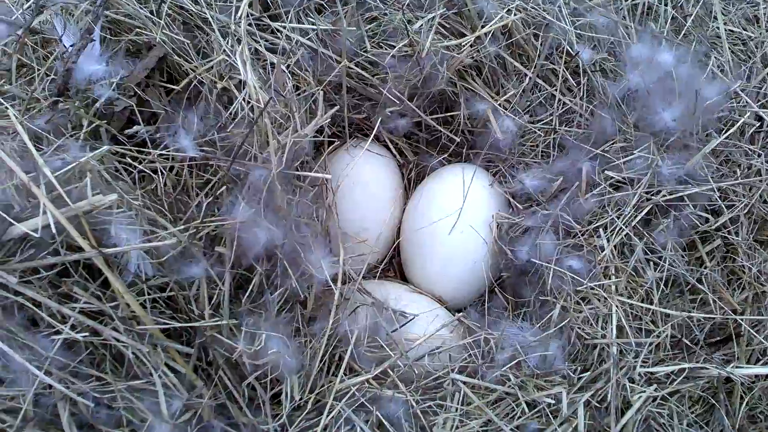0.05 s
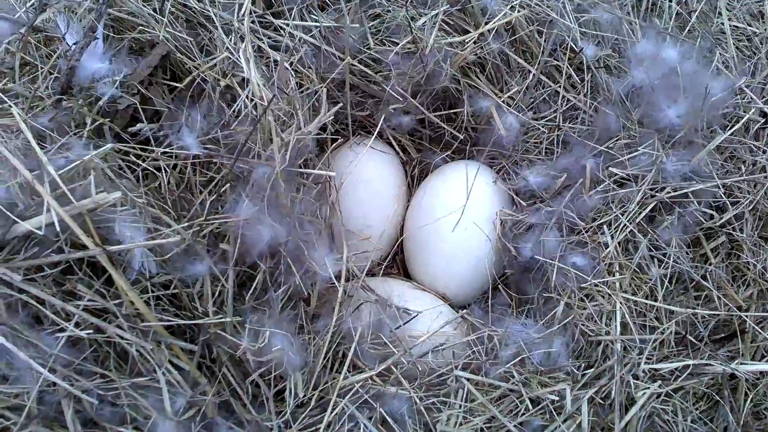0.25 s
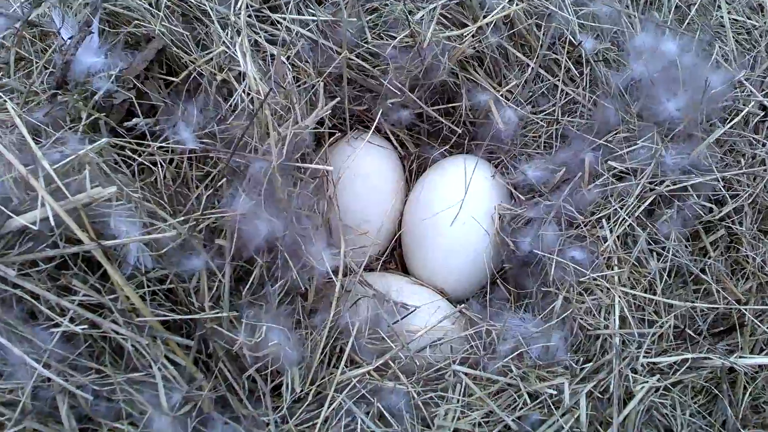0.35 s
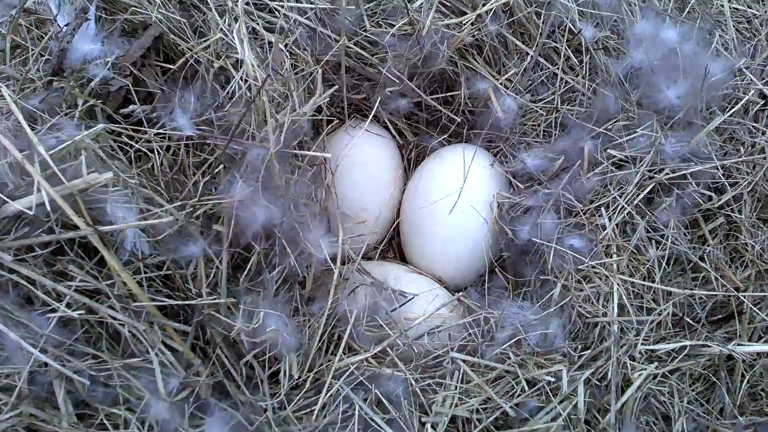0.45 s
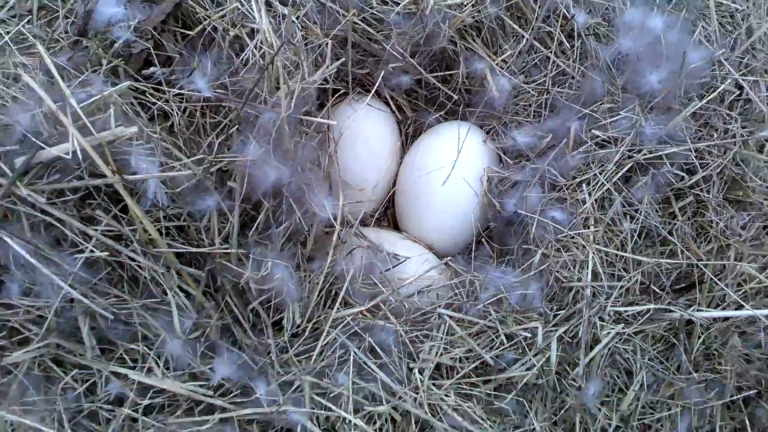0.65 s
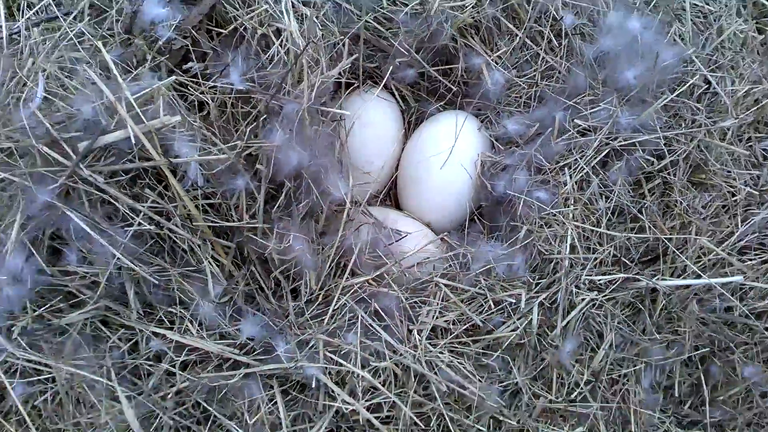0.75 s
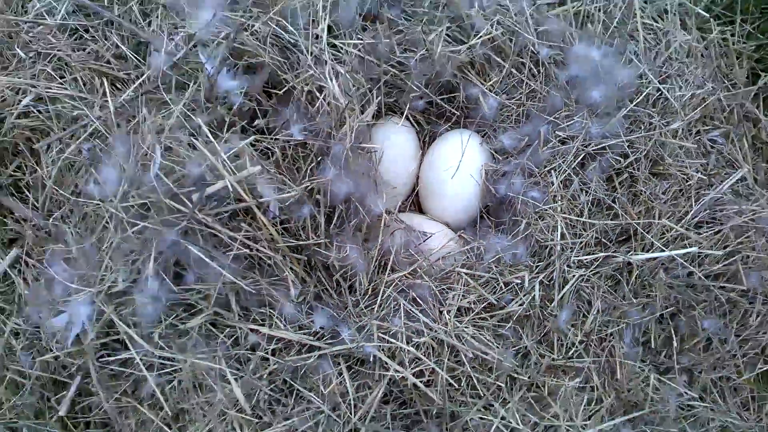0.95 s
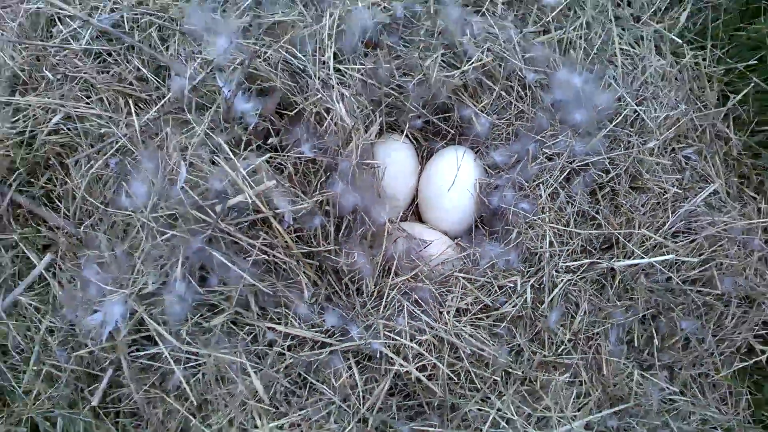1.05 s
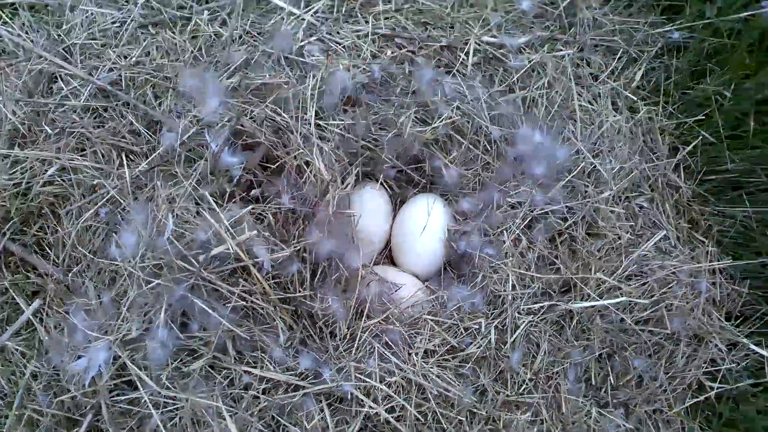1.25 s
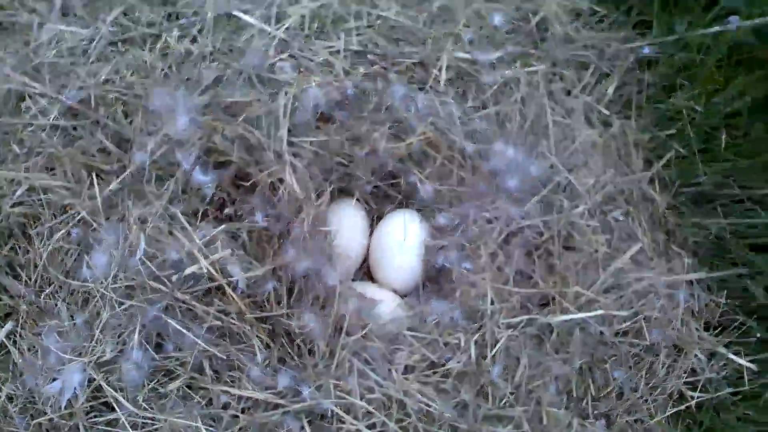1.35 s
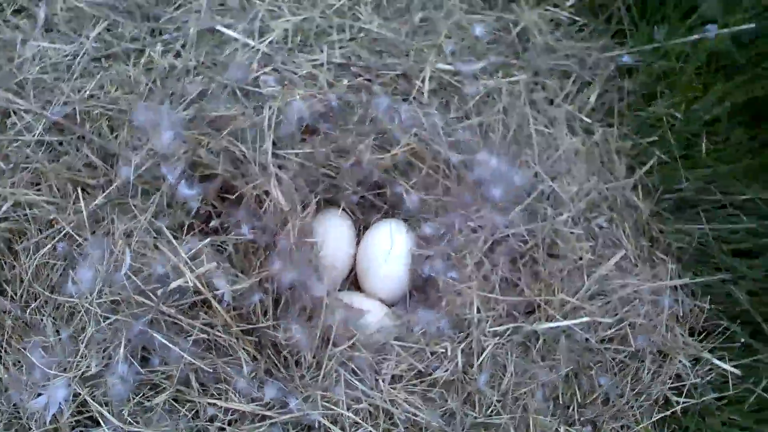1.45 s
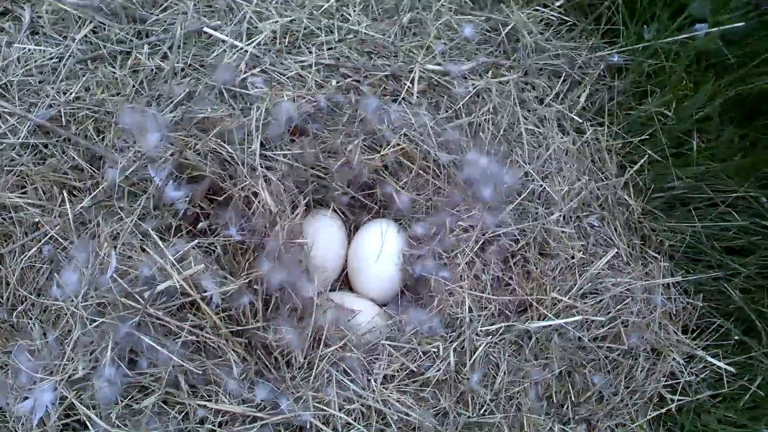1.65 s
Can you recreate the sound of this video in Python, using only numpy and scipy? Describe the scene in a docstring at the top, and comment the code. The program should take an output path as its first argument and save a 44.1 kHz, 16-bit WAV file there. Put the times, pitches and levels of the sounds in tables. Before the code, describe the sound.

A goose honks harshly from about 0.2 to 0.45 seconds, then gives a shorter honk near 0.65 seconds, both raspy with a slight outdoor echo. Low handling bumps hit the microphone, strongest around 0.5 to 0.6 seconds. Light wind rumbles throughout, with faint small bird chirps and very faint distant calls. A straw ticks once near 1.1 seconds, and the quiet background lasts until 1.7 seconds.

```python
"""Goose honking near its nest

Two harsh honks, long then short: a reedy tone and a beating shriek over air rattling through the throat.
Small birds chirp; the surroundings echo them and the goose. Faint calls carry from far off.
A hand bumps the camera, light wind rumbles on the microphone, and a straw in the hay ticks once."""
import sys
import numpy as np
from scipy import signal
from scipy.fft import rfft, irfft, next_fast_len
from scipy.io import wavfile
from scipy.ndimage import map_coordinates

SR = 44100
rng = np.random.default_rng(int(sys.argv[2]) if len(sys.argv) > 2 else 0)


def generate_wav(signal):
    """Clip the signal to [-1, 1] and save it as 16-bit WAV at the path in sys.argv[1]."""
    frames = np.transpose(np.atleast_2d(signal))
    scaled = np.clip(frames, -1, 1) * 32767
    pcm = np.round(scaled).astype(np.int16)
    wavfile.write(sys.argv[1], SR, pcm)


N = 74970
TIME = np.arange(N) / SR


def amp(db):
    """Decibels to gain."""
    return 10 ** (np.asarray(db) / 20)


def unit(x):
    """Scale to rms 1."""
    return x / np.sqrt(np.mean(x ** 2) + 1e-20)


def along(points, hz):
    """Interpolate (frequency [Hz], value) points on a log axis."""
    freqs, values = np.transpose(points)
    return np.interp(np.log(hz + 1), np.log(freqs + 1), values)


def envelope(times_s, db):
    """Gain along a dB curve, fading fast outside it."""
    outside_s = np.maximum(times_s[0] - TIME, 0) + np.maximum(TIME - times_s[-1], 0)
    return amp(np.interp(TIME, times_s, db)) * np.exp(-outside_s / 0.0037)


def wobble(rate_hz):
    """Smooth random curve, rate_hz knots a second."""
    return map_coordinates(rng.standard_normal(4096), [TIME * rate_hz], mode="wrap")


def filtered(x, response):
    """Zero-phase filter with gain response(hz)."""
    size = next_fast_len(N + SR // 2)
    return irfft(rfft(x, size) * response(np.fft.rfftfreq(size, 1 / SR)), size)[:N]


def coloured(x, colour):
    """x through a (frequency [Hz], gain [dB]) curve, at rms 1."""
    return unit(filtered(x, lambda hz: amp(along(colour, hz))))


def noise(colour):
    """Coloured noise, rms 1."""
    return coloured(rng.standard_normal(N), colour)


def tone(hz):
    """Sine along a pitch curve, rms 1."""
    return np.sqrt(2) * np.sin(2 * np.pi * np.cumsum(hz) / SR)


def rough_tone(hz, jitter, shimmer_db, rate_hz):
    """Tone with randomly shaking pitch and level, rms 1."""
    shaken = tone(hz * (1 + jitter * wobble(rate_hz)))
    return unit(shaken * amp(shimmer_db * wobble(rate_hz)))


# air and distant swell envelopes (time [s], level [dB])
AIR_LEVEL = [(0, -68), (.45, -69.5), (.75, -65), (1.05, -66), (1.3, -70), (1.55, -72), (1.7, -72)]
SWELL_LEVEL = [(.8, -109), (.95, -68.5), (1.06, -69), (1.2, -76.5), (1.35, -72)]
# air, swell and hiss spectra (frequency [Hz], gain [dB])
AIR_SPECTRUM = [(100, -5.5), (300, -0.5), (700, -1.5), (1100, 0), (1900, -6), (2600, -12), (5000, -14),
                (8000, -17.5), (15000, -20)]
SWELL_SPECTRUM = [(250, -26), (430, 0), (650, -0.5), (1000, -10), (1600, -19.5), (2500, -23.5)]
HISS_SPECTRUM = [(100, 3), (4000, -13.5), (7700, -12.5), (8200, 3), (11000, 3.5), (15500, 2)]


def open_air(hiss_db=-70.5):
    """Soft outdoor noise, a faint low swell in the distance and a steady hiss."""
    air = envelope(*np.transpose(AIR_LEVEL)) * noise(AIR_SPECTRUM)
    swell = envelope(*np.transpose(SWELL_LEVEL)) * noise(SWELL_SPECTRUM)
    return air + swell + amp(hiss_db) * noise(HISS_SPECTRUM)


# rumble and body drone envelopes (time [s], level [dB])
RUMBLE_LEVEL = [(0, -59), (.17, -57.5), (.21, -66), (.27, -53), (.35, -61), (.44, -54), (.53, -43),
                (.62, -49.5), (.7, -52), (.8, -57), (.9, -66), (1.0, -70.5), (1.17, -65), (1.33, -58),
                (1.45, -66.5), (1.52, -67), (1.7, -70.5)]
DRONE_LEVEL = [(0, -67.5), (.15, -59.5), (.35, -60.5), (.6, -56), (.8, -62.5), (1.0, -69.5), (1.08, -62),
               (1.17, -68), (1.3, -62), (1.44, -60.5), (1.55, -73), (1.7, -73.5)]
# their spectra (frequency [Hz], gain [dB])
RUMBLE_SPECTRUM = [(15, -17.5), (35, -4), (70, 4), (130, -1), (190, -8.5), (280, -22.5), (450, -36.5),
                   (1000, -100)]
DRONE_SPECTRUM = [(60, -30), (105, -2.5), (130, 2.5), (175, -5), (230, -18), (400, -46)]


def wind_and_handling():
    """Wind and hand rumble on the microphone; the camera body drones as it is moved."""
    rumble = envelope(*np.transpose(RUMBLE_LEVEL)) * noise(RUMBLE_SPECTRUM)
    drone = envelope(*np.transpose(DRONE_LEVEL)) * noise(DRONE_SPECTRUM)
    return rumble + drone


# distant calls (start [s], length [s], pitch [Hz], level [dB], relative octave level [dB], roughness [0-1])
FAR_NOTES = [(0.48, 0.38, 1440, -71, -39, 0.03), (0.876, 0.25, 1448, -78, -30, 0),
             (1.378, 0.19, 712, -75, -4, 0.3)]


def far_calls():
    """Faint held notes from far away, each with its octave."""
    out = np.zeros(N)
    for start_s, length_s, hz, db, octave_db, roughness in FAR_NOTES:
        pitch_hz = hz * (1 + 0.0614 * roughness * wobble(120))
        progress = np.clip((TIME - start_s) / length_s, 0, 1)
        arch = np.sqrt(np.abs(np.sin(np.pi * progress)))
        gain = arch * amp(db + 13 * roughness * wobble(80))
        out += gain * (tone(pitch_hz) + amp(octave_db) * tone(2 * pitch_hz))
    return out


# bird chirps, one list each (time [s], pitch [Hz], level [dB])
CHIRP_CURVES = [
    [(.10, 4500, -92.5), (.125, 4370, -79), (.16, 4380, -81)],
    [(.47, 5100, -75.5), (.485, 4270, -72.5), (.515, 4165, -65), (.545, 4140, -79)],
    [(.515, 8000, -92), (.535, 7900, -72), (.572, 7975, -82)],
    [(.862, 6100, -73), (.876, 4750, -67.5), (.905, 4824, -70.5), (.935, 4830, -78)],
    [(1.243, 6600, -96), (1.26, 5670, -79.5), (1.277, 5570, -81), (1.297, 3700, -82)],
    [(1.548, 4130, -84), (1.58, 4170, -75), (1.597, 4180, -84)],
    [(1.614, 6950, -81), (1.626, 5300, -73), (1.636, 4130, -74), (1.657, 4310, -70.5), (1.675, 4200, -76),
     (1.7, 4040, -81)],
    [(1.605, 2180, -90), (1.655, 2103, -78), (1.7, 2067, -76)],
]


def small_birds():
    """Thin whistles, most sliding down onto a held note."""
    out = np.zeros(N)
    for chirp in CHIRP_CURVES:
        times_s, hz, db = np.transpose(chirp)
        whistle = rough_tone(np.interp(TIME, times_s, hz), jitter=.007, shimmer_db=3, rate_hz=250)
        out += envelope(times_s, db) * whistle
    return out


# straw tick spectrum (frequency [Hz], gain [dB])
TICK_SPECTRUM = [(1000, -27), (5000, -16), (8000, -17), (9500, -4), (11000, 0), (12500, -24), (15000, -33)]


def straw_tick(start_s=1.082, level_db=-50, decay_s=0.0011):
    """A straw ticks: one tiny burst of bright noise."""
    age_s = TIME - start_s
    decay = (age_s > 0) * np.exp(-np.abs(age_s) / decay_s)
    return amp(level_db) * decay * noise(TICK_SPECTRUM)


# hand bumps (time [s], peak [dB], nominal pitch [Hz])
HAND_BUMPS = [(.273, -39.5, 102), (.441, -43, 92), (0.524, -29, 139), (0.548, -38.5, 90.8),
              (.568, -43.5, 143), (.587, -36, 179), (0.602, -34.5, 128), (.623, -37.5, 157),
              (0.731, -53, 165), (1.34, -48.5, 95)]


def hand_bumps(width_cycles=0.38):
    """Each bump pushes the camera body back and forth once."""
    out = np.zeros(N)
    for centre_s, peak_db, hz in HAND_BUMPS:
        offset = 2 * (TIME - centre_s) * hz / width_cycles
        out += amp(peak_db) * offset * np.exp((1 - offset ** 2) / 2)
    return out


# reflections (delay [s], level [dB])
REFLECTIONS = [(.045, -14), (.102, -13), (.215, -24.5)]
# tail decay (frequency [Hz], T60 [s])
TAIL_DECAY = [(300, 1.7), (1000, 1.6), (2000, 1.6), (4000, 1.28), (9000, .4)]
# filter on reflections and tail (frequency [Hz], gain [dB])
ECHO_SPECTRUM = [(400, -11), (800, 8), (1100, -9.5), (1500, 3), (2200, -1), (3700, -2.5), (5000, 2.5),
                 (8000, 4)]


def outdoor_echo(x, smear_s=0.015, tail_db=-17.5):
    """The surroundings return a few smeared echoes and a thin, long tail."""
    freqs, times_s, bins = signal.stft(rng.standard_normal(N), SR, nperseg=256)
    decay = amp(-60 * times_s / along(TAIL_DECAY, freqs)[:, None])
    tail = signal.istft(bins * decay, SR, nperseg=256)[1][:N]
    response = amp(tail_db) * unit(tail)
    for delay_s, db in REFLECTIONS:
        smear = (TIME > delay_s) * np.exp(-np.abs(TIME - delay_s) / smear_s)
        response += amp(db) * unit(rng.standard_normal(N) * smear)
    sent = filtered(x, lambda hz: amp(along(ECHO_SPECTRUM, hz)))
    return signal.fftconvolve(sent, response / np.sqrt(N))[:N]


def throat_rasp(throat, rattle_hz=256.7, scatter=0.23, decay_s=0.0015, breath_share=2.5):
    """Uneven air bursts and steady breath, filtered by the throat."""
    cycle = np.cumsum(rattle_hz * (1 + scatter * wobble(200))) / SR % 1
    bursts = np.exp(-cycle / rattle_hz / decay_s)
    return coloured((unit(bursts) + breath_share) * rng.standard_normal(N), throat)


# honk contours (time [s], reed level [dB], shriek level [dB], pitch [Hz])
LONG_CONTOUR = [(.212, -80, -76, 1078), (.23, -62.5, -54, 1124), (.255, -55.5, -45.5, 1174),
                (.30, -55.5, -47, 1173), (.345, -61.5, -47, 1135), (.38, -49.5, -49, 1162),
                (.41, -53, -50.5, 1103), (.432, -50.5, -56, 1064), (.452, -70, -75.5, 1098)]
SHORT_CONTOUR = [(.636, -95, -71.5, 1089), (.652, -51.5, -55, 1089), (.672, -58, -49.5, 1102),
                 (.69, -52, -53, 1055), (.702, -57, -69.5, 1036), (.713, -89, -73, 1040)]
# throat filters for the rasp (frequency [Hz], gain [dB])
LONG_FORMANTS = [(450, -45), (850, -18), (1150, -0.5), (1500, -12.5), (1930, -6), (2250, -13), (2700, -9),
                 (3250, -9.5), (3750, 1.5), (4200, -3.5), (4650, -7.5), (5650, -17.5), (6400, -14.5),
                 (7300, -25), (8600, -20.5), (10000, -32), (15000, -39)]
SHORT_FORMANTS = [(450, -50), (850, -16), (1150, -2), (1480, -6), (1900, 3.5), (2450, -18), (2850, -4),
                  (3250, -8), (3700, 4), (4150, -11), (4800, -11), (5700, -17), (6500, -13.5), (7300, -24),
                  (8600, -12.5), (10000, -33), (15000, -52)]
# throat tones of the shriek (frequency at mid pitch [Hz], relative level [dB])
SHRIEK_TONES = [(3624, -8.5), (3814, -2), (2562, -24), (4580, -18)]


def goose_honk(contour, throat, mid_pitch_hz=1136, partial_ratio=1.7, partial_db=-11.5, rasp_db=-2.5):
    """A reedy tone with a weaker partial, a shriek of beating throat tones, and a rasp."""
    times_s, reed_db, shriek_db, hz = np.transpose(contour)
    pitch_hz = np.interp(TIME, times_s, hz)
    reed = rough_tone(pitch_hz, jitter=.03, shimmer_db=2.5, rate_hz=300)
    partial = rough_tone(pitch_hz * partial_ratio, jitter=0.0348, shimmer_db=3.5, rate_hz=320)
    bend = (pitch_hz / mid_pitch_hz) ** .2  # the shriek barely follows the pitch
    shriek = sum(amp(db) * rough_tone(centre_hz * bend, jitter=0.01692, shimmer_db=3, rate_hz=260)
                 for centre_hz, db in SHRIEK_TONES)
    low = envelope(times_s, reed_db) * (reed + amp(partial_db) * partial)
    high = envelope(times_s, shriek_db) * (shriek + amp(rasp_db) * throat_rasp(throat))
    return low + high


def scene(chirp_send_db=1.5):
    """Mono mix; only the goose and the small birds echo."""
    goose = goose_honk(LONG_CONTOUR, LONG_FORMANTS) + goose_honk(SHORT_CONTOUR, SHORT_FORMANTS)
    chirps = small_birds()
    echo = outdoor_echo(goose + amp(chirp_send_db) * chirps)  # farther birds, more echo
    calls = goose + chirps + echo + far_calls()
    return (calls + hand_bumps() + straw_tick() + wind_and_handling() + open_air())[None]


def record(dry, cutoff_hz=15750):
    """Brick-wall low-pass at the camera's band limit."""
    return filtered(dry[0], lambda hz: hz < cutoff_hz)[None]


dry = scene()
out = record(dry)
generate_wav(out)
```